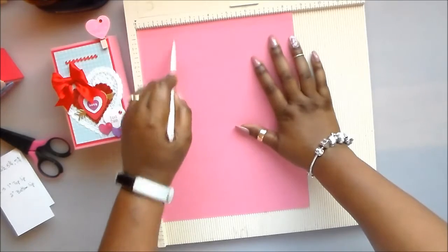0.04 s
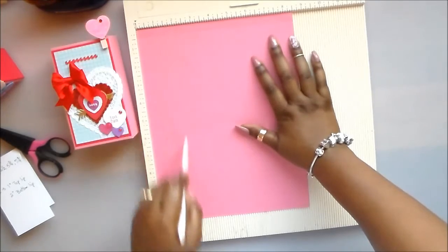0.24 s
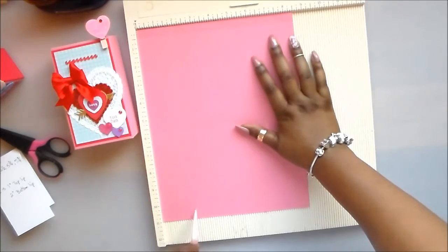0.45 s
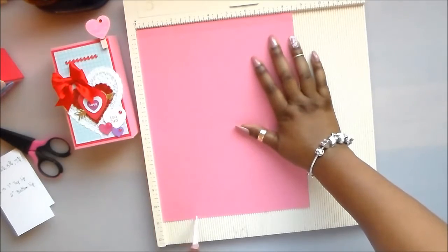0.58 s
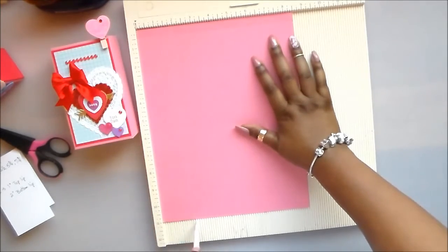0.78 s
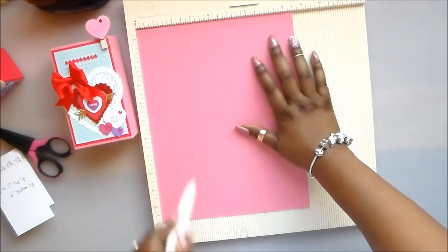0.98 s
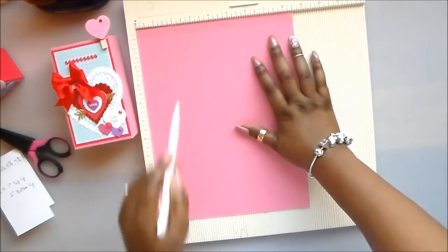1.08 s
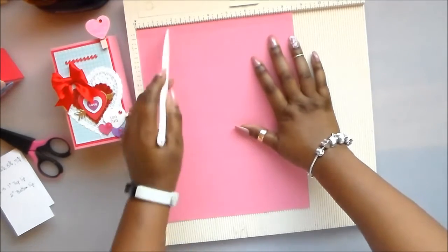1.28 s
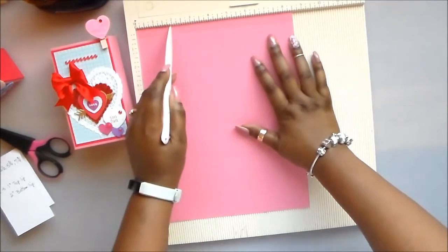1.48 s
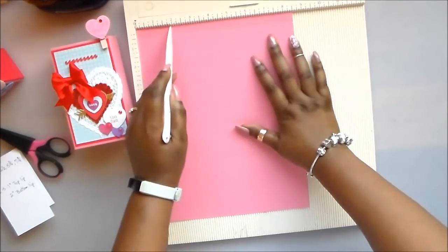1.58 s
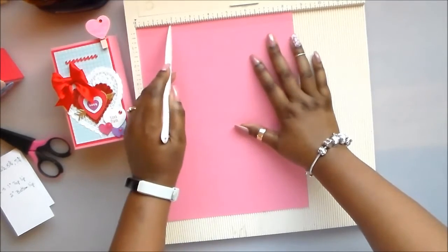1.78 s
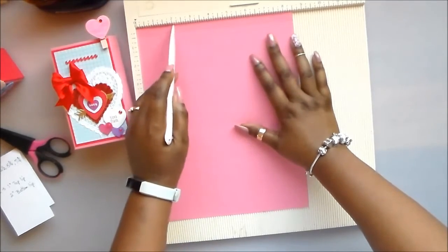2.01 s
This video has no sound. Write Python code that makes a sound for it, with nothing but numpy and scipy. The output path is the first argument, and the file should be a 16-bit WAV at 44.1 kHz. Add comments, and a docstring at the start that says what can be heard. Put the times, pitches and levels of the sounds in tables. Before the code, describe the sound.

A scoring tool scrapes down card on a hollow plastic board with a grinding, papery hiss. It knocks sharply at the edge, taps down again and stutters lightly, heard close in a small room with a faint hum.

```python
"""Scoring card on a hollow board

A bone folder grinds down a groove of a plastic scoring board, in a small room with a faint hum.
Stick-slip friction drives the board's modes and makes the card hiss; pressed hardest, the tip chatters.
It knocks at the board's edge, is set down again at the top and stutters into the next groove."""
import sys
import numpy as np
from scipy import signal
from scipy.io import wavfile
from scipy.ndimage import uniform_filter1d

SR = 44100
rng = np.random.default_rng(int(sys.argv[2]) if len(sys.argv) > 2 else 0)


def int16_out(signal):
    """Quantize to a 16-bit WAV file."""
    q = np.round(np.clip(np.atleast_2d(signal).T, -1, 1) * 32767)
    wavfile.write(sys.argv[1], SR, q.astype(np.int16))


N = 90404
T = np.arange(N) / SR

# normal modes of the board: (frequency [Hz], level [dB], T60 [s])
BOARD_MODES = [(225, -19, .07), (333, -4, 0.13), (393, 0, 0.042), (505.5, -1.5, 0.047), (549.4, -3, 0.036),
               (628.7, -8.5, 0.059), (769, -5, 0.028), (909, -8.5, 0.033), (1037, -8, 0.03),
               (1223, -9.5, 0.028), (1494, -5, 0.026), (1720, -7.5, 0.018), (1938, -11, 0.023)]
# stereo width: (frequency [Hz], side level relative to mid [dB])
WIDTH = [(30, -22.5), (130, -18), (300, -30), (700, -24), (1400, -16.5), (2800, -13.5), (5600, -1),
         (10000, 2.5)]
UPPER_FROM_HZ = 840   # divides the low modes from the upper ones
NODE_DB, NODE_HZ = 4, 9.2   # random swing of each mode as the tip crosses its nodes
HISS_SIDE_DB, TREBLE_PAN_DB = -4, [[0.53], [-0.53]]


def amp(db):
    """Amplitude ratio of a level in decibels."""
    return 10 ** (np.asarray(db) / 20)


def unit_rms(x):
    """Normalisation to unit mean square."""
    return x / np.sqrt(np.mean(x ** 2) + 1e-20)


def in_time(rows):
    """Linear interpolation of each column over time."""
    times, *columns = np.transpose(rows)
    return [np.interp(T, times, column) for column in columns]


def at_hz(spectrum, hz):
    """Interpolation of a spectrum over log frequency."""
    frequencies, db = np.transpose(spectrum)
    return np.interp(np.log(hz), np.log(frequencies), db)


def drift(corner_hz):
    """Random fluctuation: low-passed noise of unit rms."""
    pole = np.exp(-2 * np.pi * corner_hz / SR)
    return unit_rms(signal.lfilter([1], [1, -2 * pole, pole * pole], rng.standard_normal(N + SR))[SR:])


def noise(spectrum, side_db):
    """Superposed third-octave bands of stereo noise, wider towards the treble; unit rms."""
    edges = 18 * 2 ** (np.arange(30) / 3 + 1 / 6)
    white, out = rng.standard_normal((2, 2, N)), 0
    for k, (low, high) in enumerate(zip(edges, edges[1:])):
        hz = np.sqrt(low * high)
        if spectrum[0][0] / 2 < hz < spectrum[-1][0] * 2:
            band = signal.butter(2, [low, high], "band", fs=SR, output="sos")
            mid, side = signal.sosfilt(band, white[k % 2])
            width = amp(min(at_hz(WIDTH, hz) + side_db, 0))
            out = out + amp(at_hz(spectrum, hz)) * (mid + width * side * [[1], [-1]])
    return unit_rms(out)


def decay(t, t60):
    """Exponential decay from t = 0, by 60 dB in t60."""
    return (t >= 0) * np.exp(-np.log(1000) * np.maximum(t, 0) / t60)


def damped_sine(t, hz, t60):
    """Free vibration of a damped oscillator."""
    return decay(t, t60) * np.sin(2 * np.pi * hz * t)


def resonate(force, hz, t60):
    """Forced vibration of a damped oscillator; a unit impulse rings with amplitude 1."""
    radius, angle = amp(-60 / (t60 * SR)), 2 * np.pi * hz / SR
    return signal.lfilter([0, np.sin(angle)], [1, -2 * radius * np.cos(angle), radius ** 2], force + 1e-18)


def background():
    """Ambient noise: soft hiss, rumble and a hum modulated in level and frequency."""
    # noise spectra: (frequency [Hz], relative density [dB])
    floor_spectrum = [(130, -0.5), (220, -3.5), (340, 0.5), (550, -2.5), (850, -11.5), (2000, -14),
                      (4000, -17.5), (14000, -22.5)]
    rumble_spectrum = [(20, 18.5), (31, -2), (45, -3.5), (62, -36), (80, 3.5), (130, -34), (250, -60)]
    # envelope of the hum: (time [s], level [dB])
    hum_envelope = [(0.0, -57), (0.25, -50.5), (0.85, -51.5), (0.88, -58), (1.6, -60.5), (1.67, -47),
                    (1.75, -62), (1.79, -55), (2.05, -54.5)]
    hum_db, = in_time(hum_envelope)
    hum_hz = 100.5 + 2.14 * drift(3.6)
    hum = np.sqrt(2) * np.sin(2 * np.pi * np.cumsum(hum_hz) / SR)
    hiss = amp(-62) * noise(floor_spectrum, side_db=14)
    rumble = amp(-57) * noise(rumble_spectrum, side_db=10)
    return hiss + rumble + amp(hum_db - 0.5 + 0.5 * drift(1.7)) * hum


def room(x):
    """Reverberation: convolution with a short diffuse tail, duller than the direct sound."""
    # colour of the tail: (frequency [Hz], relative density [dB])
    spectrum = [(150, 9.5), (400, -3.5), (1000, 6), (2000, 3), (5000, -3.5), (14000, -7.5)]
    tail = (noise(spectrum, side_db=0.5) * decay(T - 0.016, t60=0.38))[:, :SR // 2]
    tail = tail / np.sqrt(np.sum(tail ** 2) / 2)
    return amp(-17.5) * signal.fftconvolve(x, tail, axes=1)[:, :N]


def rustle():
    """Light sliding friction of hand and tool on the card."""
    # shifting of the hand: (time [s], level [dB])
    envelope = [(0, -54), (.3, -52.5), (.7, -51.5), (.82, -53), (.9, -61), (1.0, -57), (1.1, -64),
                (1.27, -70.5), (1.43, -52.5), (1.62, -50), (1.74, -53), (1.85, -47), (1.96, -52.5),
                (2.05, -53.5)]
    # colour of the rubbing: (frequency [Hz], relative density [dB])
    spectrum = [(30, 4.5), (60, 6.5), (130, -3), (200, -4), (320, 1), (600, -4.5), (1200, -16), (2500, -23),
                (6000, -26), (14000, -28.5)]
    level_db, = in_time(envelope)
    return amp(level_db + 0.77 * drift(23)) * noise(spectrum, side_db=12.5)


def pings():
    """Free vibration: hard contacts of the tip leave a thin ring."""
    # partials: (time [s], frequency [Hz], level [dB], T60 [s])
    partials = [(1.476, 2950, -31.5, 0.028), (1.547, 5750, -51, .2), (1.547, 6300, -44, 0.069),
                (1.547, 3780, -47, 0.027)]
    return sum(amp(db) * damped_sine(T - s, hz, t60) for s, hz, db, t60 in partials)


def disperse(x):
    """Dispersion of bending waves: all-pass stages give each frequency its own delay."""
    for hz in (495, 1190):
        _, denominator = signal.iirpeak(hz, Q=1.03, fs=SR)
        x = signal.lfilter(denominator[::-1], denominator, x)
    return x


def blow(centre_hz):
    """Impulse response: a contact and its brief grating excite the modes near a centre frequency."""
    t, rings = T[:SR // 4], 0
    for hz, db, t60 in BOARD_MODES:
        scatter_db = 1.5 * rng.standard_normal()
        off_centre_db = 2.5 * np.log2(hz / centre_hz) ** 2
        rings = rings + amp(db + scatter_db - off_centre_db) * damped_sine(t, hz, t60)
    grating = amp(-28.5) * rng.standard_normal(len(t)) * decay(t, t60=0.045)
    contact = signal.butter(2, [centre_hz / 1.636, centre_hz * 1.636], "band", fs=SR, output="sos")
    return signal.sosfilt(contact, rings + signal.fftconvolve(rings, grating)[:len(t)])


def crack_envelope(s, db):
    """Two-stage decay of a hard contact: a snap and a short fade."""
    return amp(db) * (decay(T - s, t60=0.014) + amp(-8) * decay(T - s, t60=0.11))


def taps():
    """Impact excitation: blows ring the board and crack; the hardest also thumps the table beneath."""
    # the folder hits or catches: (time [s], thud level [dB], thud centre [Hz], crack level [dB])
    blows = [(.203, -37.5, 590, -66), (.419, -31, 520, -44), (0.687, -54, 690, -49.5),
             (.724, -44, 750, -52), (0.8388, -15, 767, -24.5), (.8425, -21, 476, -29.5),
             (1.007, -42.5, 530, -53.5), (1.4612, -29, 970, -43), (1.4717, -20, 840, -51),
             (1.476, -39, 900, -30), (1.482, -27.5, 810, -47), (1.517, -39.5, 820, -61),
             (1.653, -41.5, 756, -58), (1.762, -33.5, 1100, -42.5), (1.765, -31, 514, -60),
             (1.7812, -36.5, 1260, -49.5), (1.783, -34, 484, -68), (1.8084, -37.5, 1180, -66),
             (1.828, -36, 820, -50), (1.832, -40, 1330, -54), (1.8509, -35, 820, -49),
             (1.8864, -35, 810, -53), (1.9196, -33.5, 820, -54.5)]
    # clicks too light to move the board: (time [s], crack level [dB])
    ticks = [(1.547, -34), (1.714, -45)]
    # colour of a crack: (frequency [Hz], relative density [dB])
    spectrum = [(600, 10), (1500, 2.5), (2500, -0.5), (3900, 2), (6000, -6.5), (9000, -8.5), (12000, -11.5),
                (14000, -39)]
    thuds = sum(amp(db) * np.pad(blow(hz), (int(s * SR), N))[:N] for s, db, hz, _ in blows)
    envelope = sum(crack_envelope(s, db) for s, *_, db in blows + ticks)
    cracks = envelope * noise(spectrum, side_db=-4.5) * amp(TREBLE_PAN_DB)
    thump = amp(-35) * damped_sine(T - 0.84, hz=165, t60=0.064)
    return thump + disperse(thuds) + cracks


def radiate(x):
    """Radiation efficiency: a small board gives off little bass."""
    return signal.sosfilt(signal.butter(2, 270, "high", fs=SR, output="sos"), x)


def chatter():
    """Relaxation oscillation: nearly periodic slips make the low modes groan."""
    # runs of stick-slip: (time [s], duration [s], slip rate [Hz], level [dB])
    runs = [(0.36, 0.034, 475, -26), (0.408, 0.013, 520, -25.5)]
    jitter, out = 0.07, 0
    for s, duration, rate_hz, level_db in runs:
        cycles = np.cumsum(rate_hz * (1 + jitter * drift(rate_hz / 2))) / SR
        slips = np.diff(np.floor(cycles), prepend=0) * (T > s) * (T < s + duration)
        groan = sum(amp(db) * resonate(slips, hz, t60) for hz, db, t60 in BOARD_MODES if hz < UPPER_FROM_HZ)
        out = out + amp(level_db) * unit_rms(radiate(groan)) * np.sqrt(duration / T[-1])
    return out


def card():
    """Resonance: friction noise drives the card's heavily damped modes; unit rms."""
    # modes under the tip: (frequency [Hz], bandwidth [Hz], level [dB])
    modes = [(1670, 62, -13), (2650, 350, 1.5), (3590, 160, -1.5), (4380, 150, 4), (5450, 260, 0),
             (9000, 1100, -2), (11900, 360, -0.5)]
    out = 0
    for hz, bandwidth_hz, db in modes:
        mid, side = resonate(rng.standard_normal((2, N)), hz, t60=np.log(1000) / (np.pi * bandwidth_hz))
        motion = mid + amp(at_hz(WIDTH, hz) + HISS_SIDE_DB) * side * [[1], [-1]]
        out = out + amp(db + NODE_DB * drift(NODE_HZ)) * unit_rms(np.gradient(motion, axis=1))
    return unit_rms(out)


def steady(x):
    """Division by the running rms evens out slow changes of level."""
    return x / np.sqrt(np.abs(uniform_filter1d(x ** 2, size=1300)) + 1e-12)


def scrape():
    """Stick-slip friction: tiny random slips drive the board's modes, and the paper fibres hiss."""
    # the stroke: (time [s], low-mode level [dB], upper-mode level [dB], hiss level [dB])
    stroke = [(0.0, -63, -59, -80), (0.02, -72, -87, -78), (0.066, -64, -76, -76),
              (0.142, -56.5, -63.5, -56), (0.284, -29, -34, -45), (0.33, -30.5, -30.5, -39),
              (0.382, -22.5, -35, -42), (0.404, -30, -41, -36.5), (0.42, -26, -32.5, -36.5),
              (0.464, -26.5, -37, -38), (0.596, -40, -38.5, -49), (0.662, -52.5, -75, -64),
              (0.712, -52.5, -53, -59.5), (0.784, -70, -75, -92), (0.82, -72, -51.5, -57.5)]
    # pitch the board favours as the tip travels: (time [s], frequency [Hz])
    travel = [(.2, 535), (.3, 430), (.37, 540), (.43, 467), (.49, 400), (.54, 436), (.6, 573)]
    # paper friction: (frequency [Hz], relative density [dB])
    hiss_spectrum = [(1200, -25), (2200, 0.5), (2700, 0.5), (3400, 1), (4400, -2.5), (6500, -6.5),
                     (10500, -9), (12000, -12.5), (14000, -19)]
    slips_per_s, lift_db_per_s = 1500, 111
    low_db, upper_db, hiss_db = in_time(stroke) - lift_db_per_s * np.maximum(T - stroke[-1][0], 0)
    slips = (rng.random(N) < slips_per_s / SR) * amp(2.5 * np.minimum(rng.exponential(1, N), 4))
    favoured_hz, = in_time(travel)
    low, upper = 0, 0
    for hz, db, t60 in BOARD_MODES:
        mode = amp(db + NODE_DB * drift(NODE_HZ)) * resonate(slips * rng.standard_normal(N), hz, t60)
        if hz < UPPER_FROM_HZ:
            low = low + amp(-11 * np.log2(hz / favoured_hz) ** 2) * mode
        else:
            upper = upper + mode
    low = amp(low_db - 0.5) * steady(radiate(radiate(radiate(low))))
    upper = amp(upper_db - 1) * steady(radiate(upper))
    grain_db = drift(53)
    paper = noise(hiss_spectrum, side_db=HISS_SIDE_DB) + amp(-2) * card()
    return low + upper + amp(hiss_db - 3 + grain_db) * paper * amp(TREBLE_PAN_DB)


def scene():
    """Superposition of the board, its reverberation, the rustle and the background."""
    board = scrape() + chatter() + taps() + pings()
    return board + room(board) + rustle() + background()


def record(dry):
    """Soft saturation rounds the peaks; a steep low-pass cuts the top."""
    ceiling = amp(-10)
    low_pass = signal.ellip(10, .2, 70, 14300, fs=SR, output="sos")
    return signal.sosfilt(low_pass, ceiling * np.tanh(dry / ceiling))


dry = scene()
out = record(dry)
int16_out(out)
```